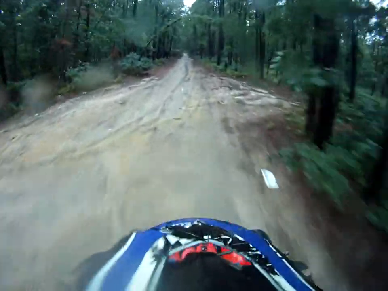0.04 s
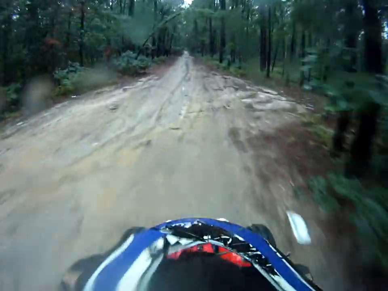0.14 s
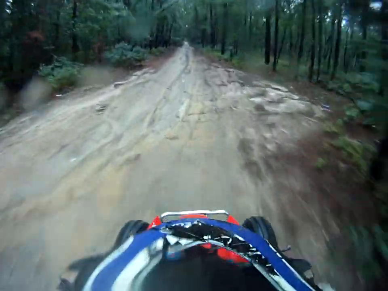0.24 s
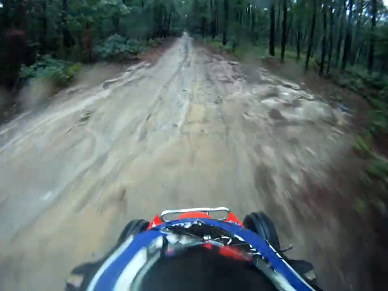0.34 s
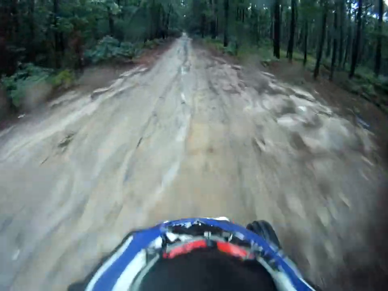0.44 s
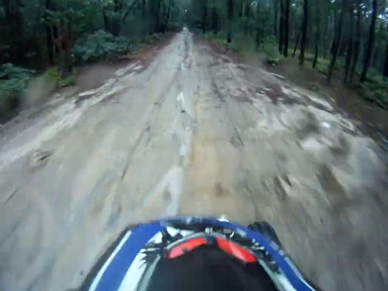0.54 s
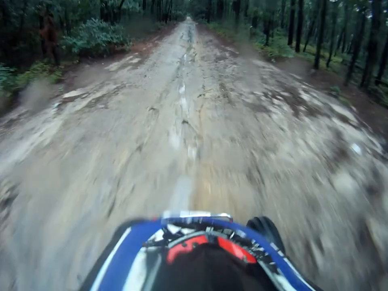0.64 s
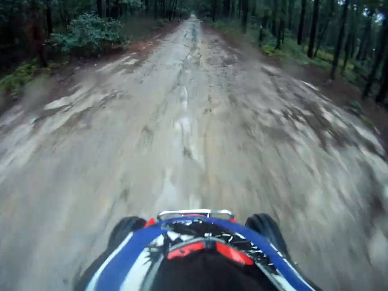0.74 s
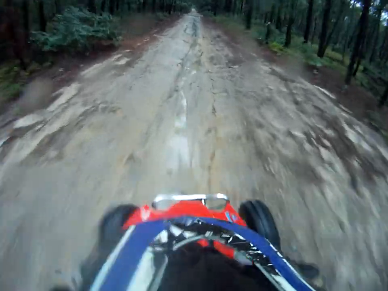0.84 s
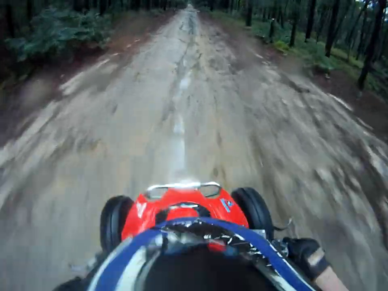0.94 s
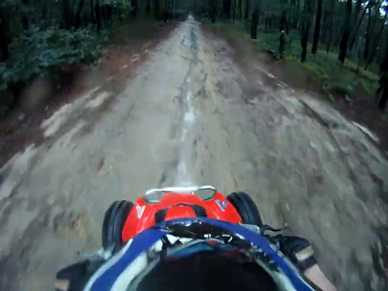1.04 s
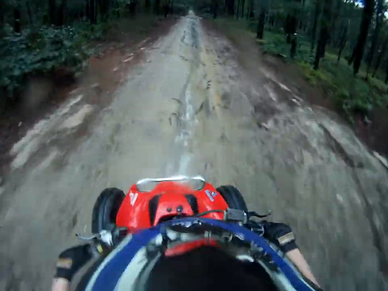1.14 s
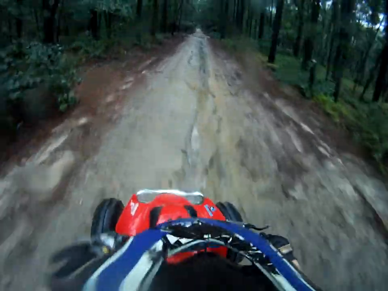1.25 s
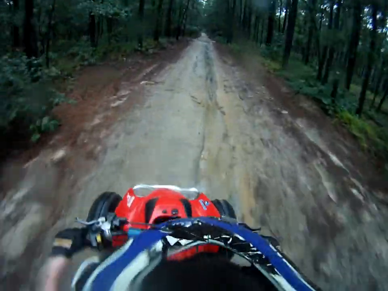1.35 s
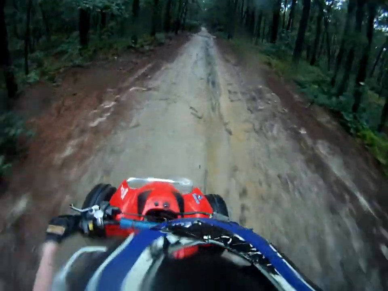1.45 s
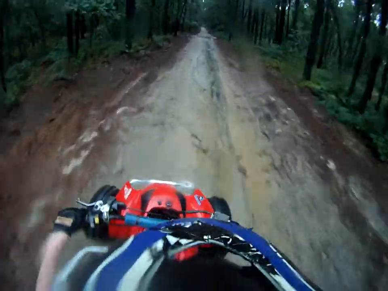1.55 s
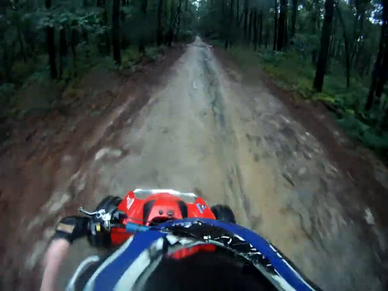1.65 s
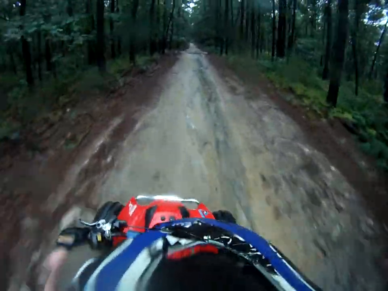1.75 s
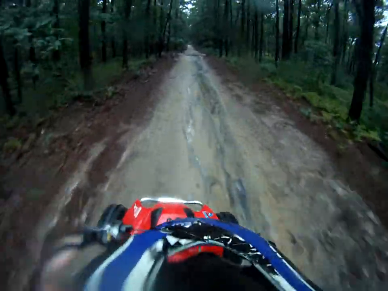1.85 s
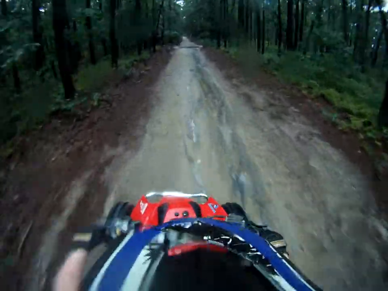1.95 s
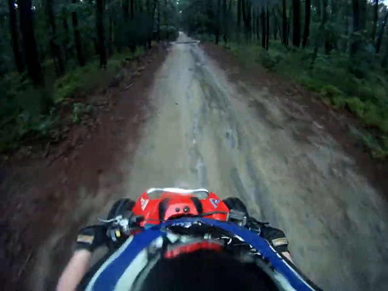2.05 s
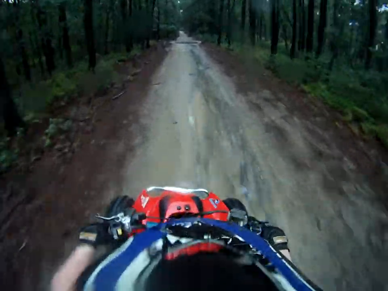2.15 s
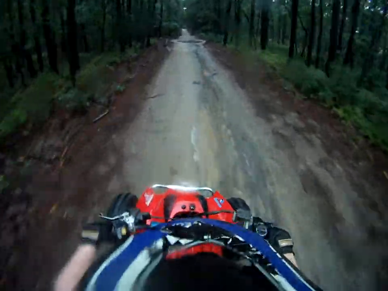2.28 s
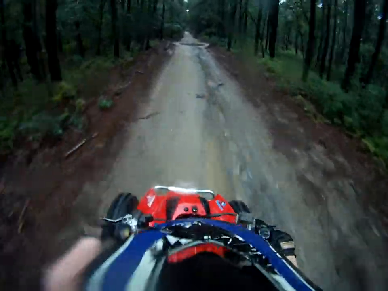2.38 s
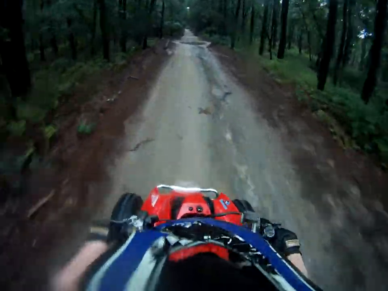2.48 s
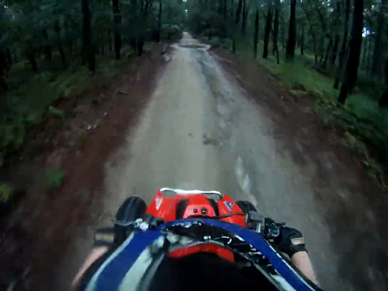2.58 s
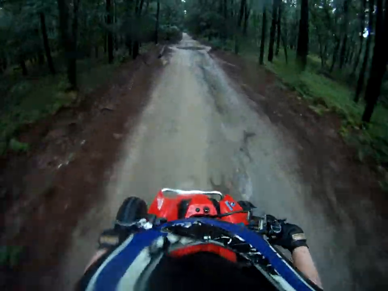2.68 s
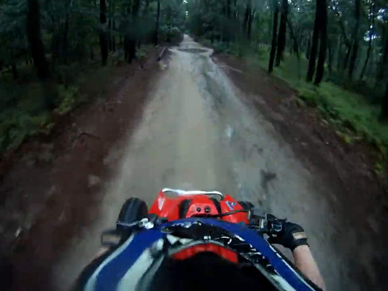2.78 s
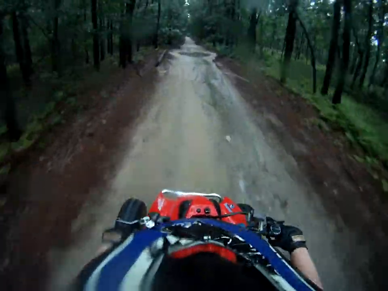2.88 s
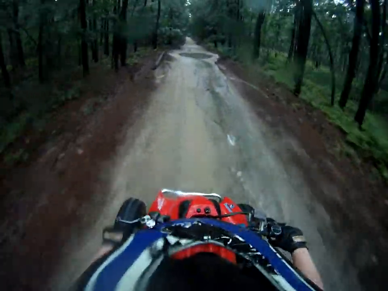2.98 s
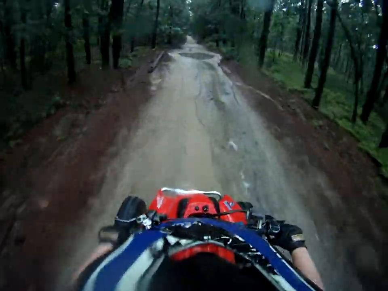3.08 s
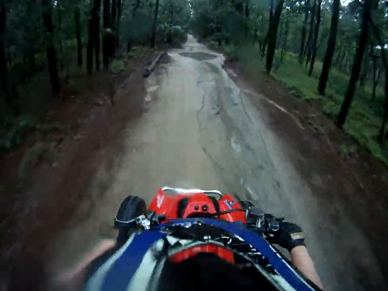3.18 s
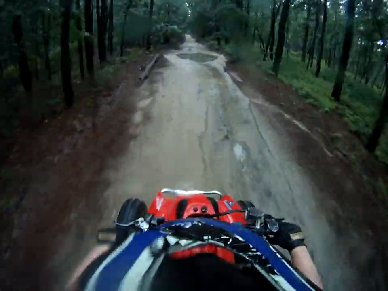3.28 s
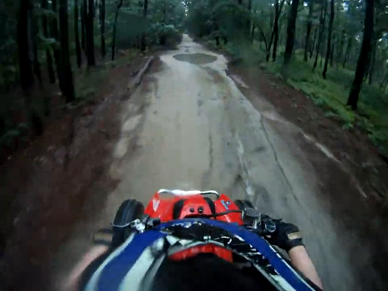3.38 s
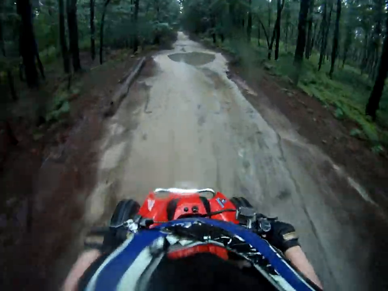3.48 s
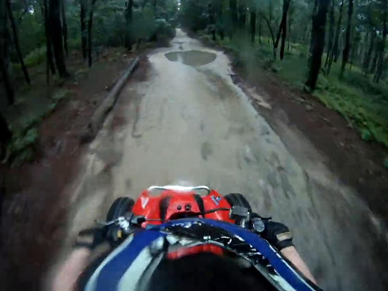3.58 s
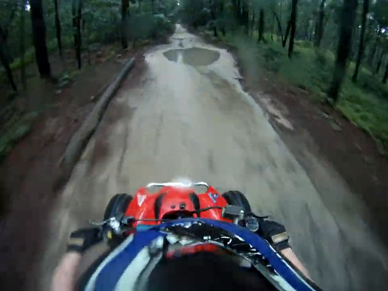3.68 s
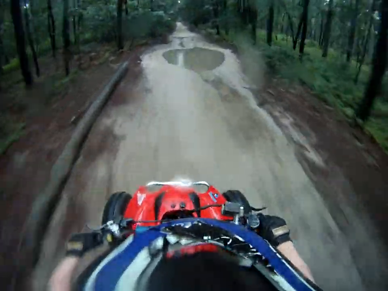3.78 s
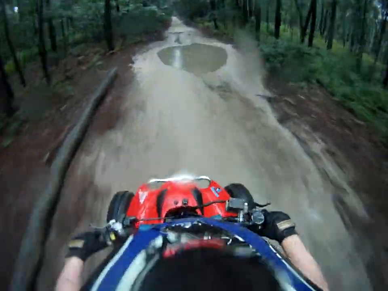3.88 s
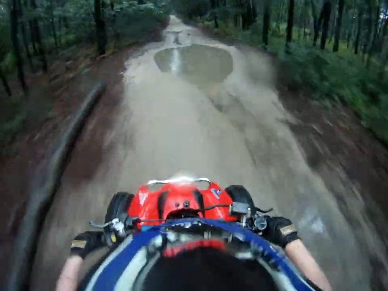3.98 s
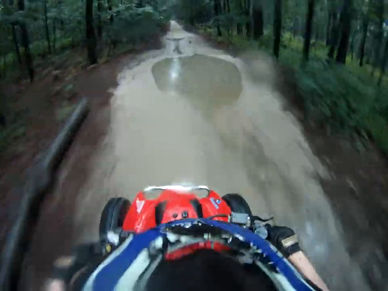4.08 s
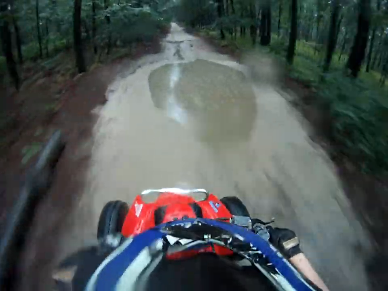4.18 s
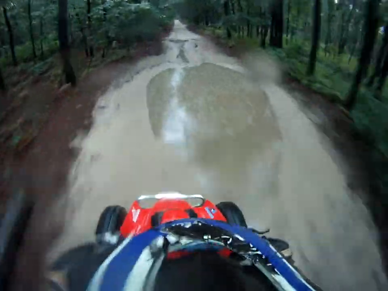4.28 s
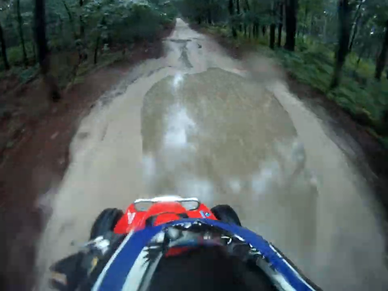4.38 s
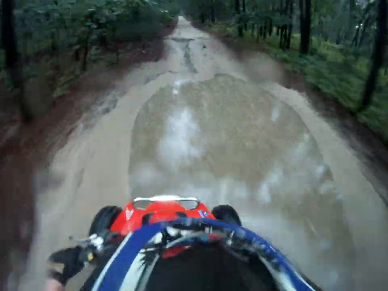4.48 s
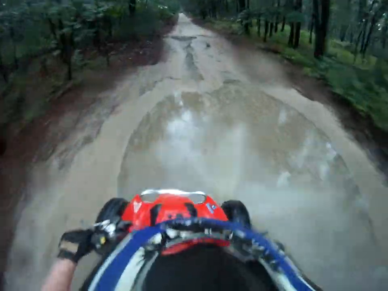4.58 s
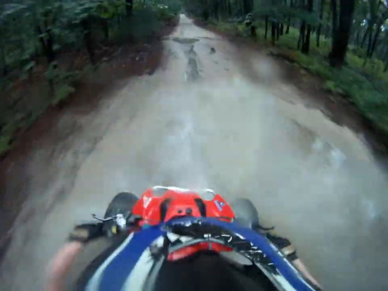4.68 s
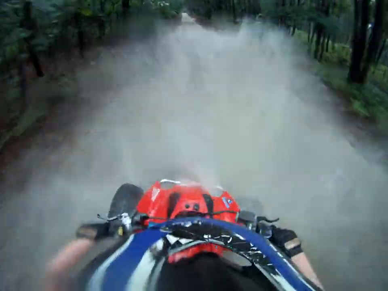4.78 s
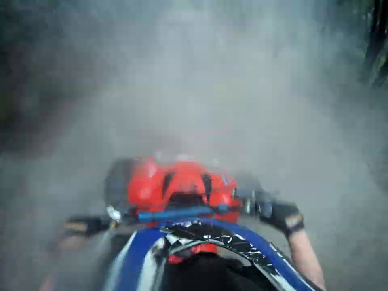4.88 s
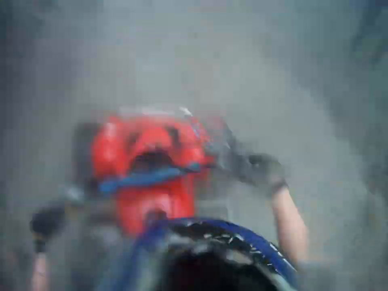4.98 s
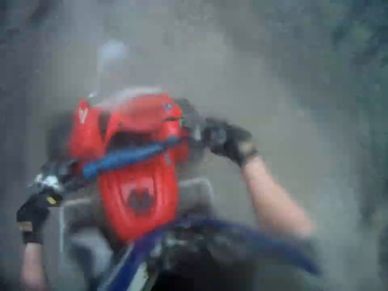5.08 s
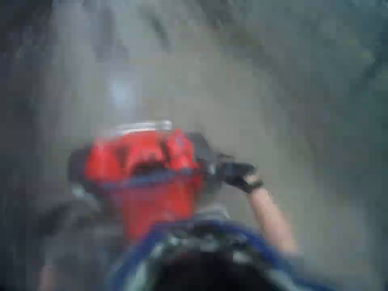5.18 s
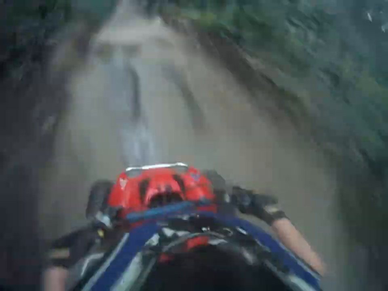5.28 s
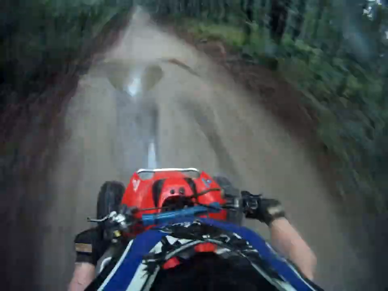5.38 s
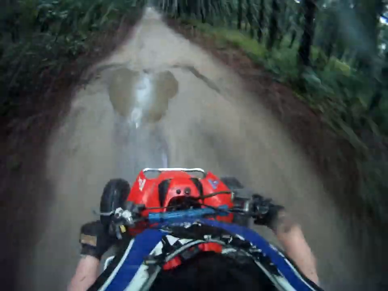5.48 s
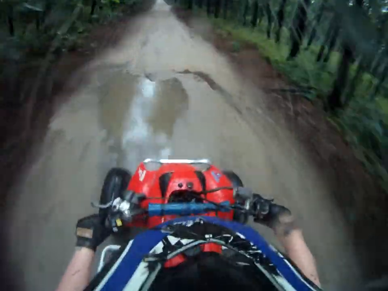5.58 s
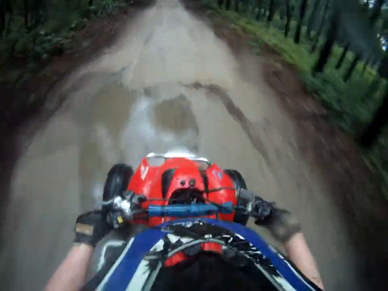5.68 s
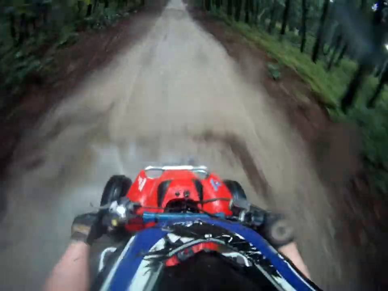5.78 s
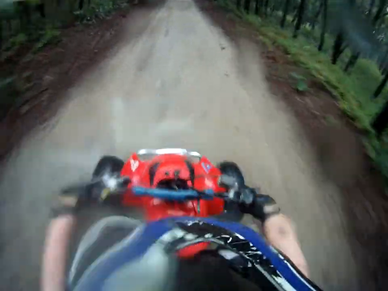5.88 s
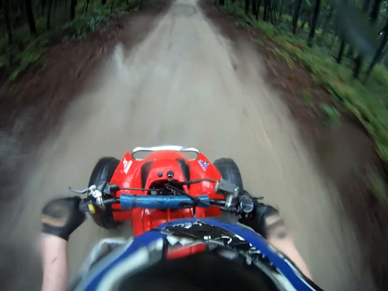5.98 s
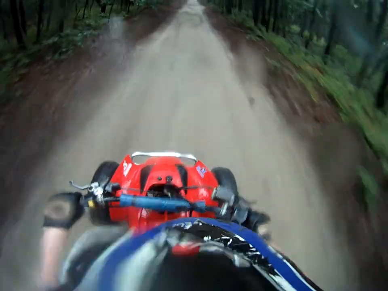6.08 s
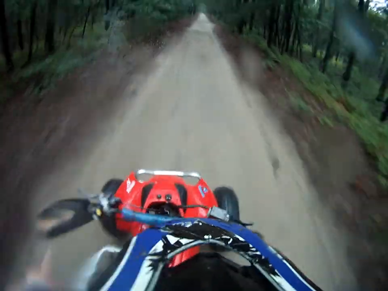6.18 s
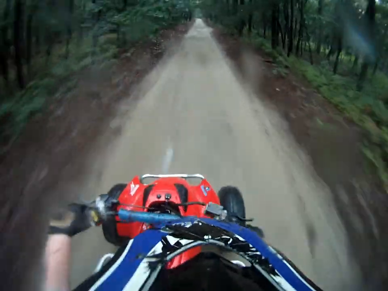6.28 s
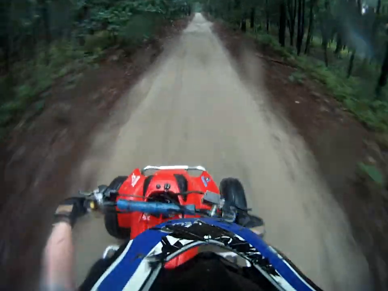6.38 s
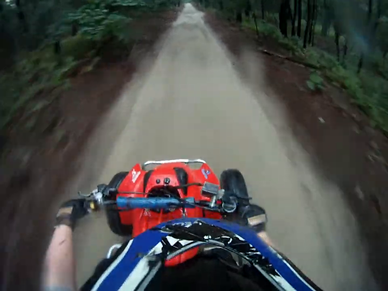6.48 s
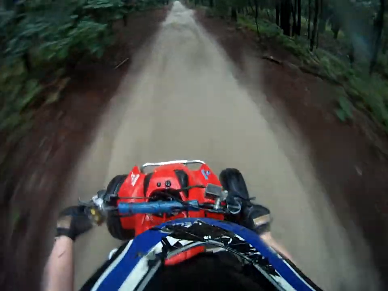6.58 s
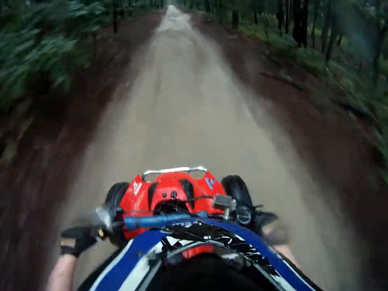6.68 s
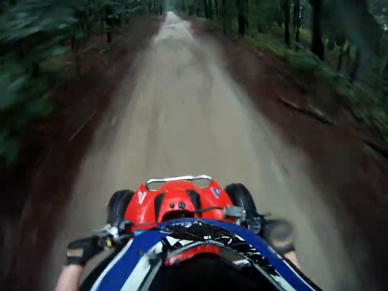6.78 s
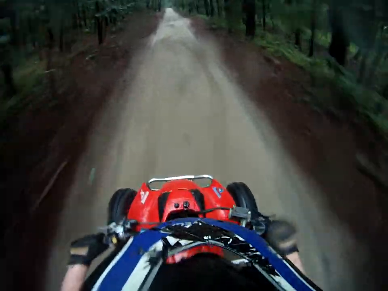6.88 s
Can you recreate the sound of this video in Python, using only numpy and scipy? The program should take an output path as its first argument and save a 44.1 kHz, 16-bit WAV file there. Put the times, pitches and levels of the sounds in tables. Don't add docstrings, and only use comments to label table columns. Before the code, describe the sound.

Helmet-mounted, muffled and distorted sound of a small quad on a wet dirt track: throaty single-cylinder putter, exhaust rasp and case buzz. Scattered ticks and knocks mark the bumps. Midway the engine surges, then a dense splash rattles the housing with watery clatter, sharp clacks and low suspension thuds, the level ducking after overloads. A lighter splash follows, the engine drones on, and one violent knock lands near the end.

```python
import sys
import numpy as np
from scipy import signal
from scipy.io import wavfile
from scipy.ndimage import uniform_filter1d

SR = 44100
rng = np.random.default_rng(int(sys.argv[2]) if len(sys.argv) > 2 else 0)


def inscribe(sig):
    pcm = np.round(np.clip(np.atleast_2d(sig).T, -1, 1) * 32767)
    wavfile.write(sys.argv[1], SR, pcm.astype(np.int16))


def field_ratio(decibels):
    return 10 ** (np.asarray(decibels, dtype=float) / 20)


N = 306054

# hz, width_hz, level_db
CASE_BRIGHT_MODES = [(2850, 680, -3.5), (3586, 324, 1.5), (5200, 10800, -7)]


def rms_one(x):
    return x / np.sqrt(np.mean(x ** 2) + 1e-20)


def in_time(rows):
    s, *columns = np.transpose(rows)
    return [np.interp(np.arange(N) / SR, s, c) for c in columns]


def butter(x, hz, kind, order=2):
    return signal.sosfilt(signal.butter(order, hz, kind, fs=SR, output="sos"), x)


def delayed(x, s):
    return np.r_[np.zeros(int(s * SR)), x][:N]


def ring(x, hz, t60):
    r, w = field_ratio(-60 / (t60 * SR)), 2 * np.pi * hz / SR
    return signal.lfilter([0, np.sin(w)], [1, -2 * r * np.cos(w), r * r], x + 1e-18)


def ring_all(x, modes, tune=1):
    return sum(field_ratio(db) * ring(x, tune * hz, t60) for hz, db, t60 in modes)


def resonate(x, modes):
    out = 0
    for k, (hz, width_hz, db) in enumerate(modes):
        r = np.exp(-np.pi * width_hz / SR)
        b = np.array([1, 0, -1]) * (1 - r * r) / 2
        a = [1, -2 * r * np.cos(2 * np.pi * hz / SR), r * r]
        out = out + (-1) ** k * field_ratio(db) * signal.lfilter(b, a, x)
    return out


def blend(locked, free, free_share):
    return np.sqrt(1 - free_share) * rms_one(locked) + np.sqrt(free_share) * rms_one(free)


def grit(per_s, spread_db):
    sizes = field_ratio(spread_db * np.minimum(rng.exponential(1, N), 2.5)) * rng.choice([-1, 1], N)
    hits = sizes * (rng.random(N) < per_s / SR)
    return rms_one(rms_one(hits) + 1.75 * rng.standard_normal(N))


def spray_db():
    # peak_s, level_db
    splashes = [(4.9, -31), (4.96, -17), (5.03, -18.5), (5.13, -17), (5.19, -17), (5.25, -15.5),
                (5.32, -13), (5.38, -21), (5.45, -22.5), (5.561, -14.5), (5.95, -32)]
    rise_db_s, fall_db_s = 143, 160
    t = np.arange(N) / SR
    power = 0
    for s, db in splashes:
        below_db = np.maximum(rise_db_s * (s - t), fall_db_s * (t - s))
        power = power + field_ratio(db - below_db) ** 2
    return 10 * np.log10(power + 1e-12)


def drops(per_s, cycles):
    clump = rms_one(butter(rng.standard_normal(N), 29, "low"))
    sizes = field_ratio(1.0 * np.minimum(rng.exponential(1, N), 4)) * rng.choice([-1, 1], N)
    born = rng.random(N) < per_s * field_ratio(4.5 * clump) / SR
    pitches, dealt = np.geomspace(850, 3900, 16), rng.integers(0, 16, N)
    lift = field_ratio(12.4 * np.exp(-(np.log(pitches / 2350) / 0.12) ** 2))
    out = 0
    for k, (hz, gain) in enumerate(zip(pitches, lift)):
        out = out + gain * ring(sizes * born * (dealt == k), hz, cycles / hz)
    return rms_one(out)


def knocks():
    # start_s, peak_db, ring_hz, bright_db (re peak), length_ms
    bumps = [(0.216, -15.5, 2080, -22, 3.8), (0.225, -23, 994, -27, 6), (.236, -25, 1430, -20, 6.5),
             (.231, -18, 2100, -26, 4.9), (0.438, -22, 1980, -28, 6.7), (1.956, -22.5, 2240, -3, 4.3),
             (2.155, -19, 2310, -20, 8.1), (2.231, -26, 2070, 0.5, 3.5), (2.65, -24, 2310, -20, 4),
             (2.954, -14.5, 1110, -29.5, 1.8), (3.019, -15.5, 2180, -32, 2.9), (3.388, -15, 2770, -5, 2.6),
             (3.615, -12, 900, -13, 5.4), (3.736, -13.5, 2070, -19, 2.1), (4.123, -21, 2290, -12, 4.7),
             (4.196, -22, 980, -7.5, 5.5), (6.42, -18.5, 2215, -16, 8.4), (6.449, -17, 2220, -6, 4.4),
             (6.475, -15, 2180, -21, 4.2), (6.488, 11, 1850, -8, 2.2), (6.491, -3.5, 996, -37, 5.5),
             (6.682, -5.5, 2340, -11, 2.6)]
    # start_s, peak_db, ring_hz, bright_db (re peak), length_ms
    lumps = [(4.934, -6, 2550, -19, 1.2), (4.986, 3, 2260, -26, 0.69), (5.127, -12, 2250, -23, 3),
             (5.189, -7, 2220, -17, 1.6), (5.265, 4.5, 2287, -33, 2.7), (5.275, -8, 2210, -7, 2.4),
             (5.294, -11, 2480, -6, 4.9), (5.357, -13, 990, -18, 2.2), (5.368, 1.5, 2390, -24, 1.1),
             (5.374, 3, 2140, -19, 1), (5.391, -3.5, 2340, 3.5, 1.2), (5.442, -11, 1950, -5, 4.6),
             (5.483, -8, 990, -29, 4.4), (5.503, -4.5, 2040, -30, 3.4), (5.548, -7, 1090, -28, 1.8),
             (5.585, 3, 1027, -36, 3.05), (5.622, 5.5, 980, -35, 1.9), (5.639, 0.5, 1000, -7, 1.7),
             (5.658, 9.5, 2187, -34, 6.4)]
    # start_s, peak_db, pitch_hz
    jolts = [
        (.215, -21, 100),
        (5.04, -28, 40),
        (5.376, -10, 125),
        (5.547, -5.5, 126),
        (5.6, -15, 90),
        (5.65, -9, 112),
        (6.489, -8, 130),
    ]
    hits = [*bumps, *lumps]
    out, t = np.zeros(N + 2000), np.arange(1500) / SR
    for (s, db, hz, bright_db, ms), noise in zip(hits, rng.standard_normal((len(hits), len(t)))):
        shape = np.minimum(t / 0.0012, 1) * np.exp(-np.maximum(t - ms / 1000, 0) / 0.00091)
        wobble = np.cumsum(butter(noise, 500, "low")) * 0.039
        chatter = 1 + .5 * rms_one(butter(noise[::-1], 1380, "low"))
        tone = np.sin(2 * np.pi * hz * t + wobble) * chatter
        crack = field_ratio(bright_db) * rms_one(resonate(noise, CASE_BRIGHT_MODES))
        rough = 0.3 * rms_one(butter(noise, [850, 2700], "band"))
        out[int(s * SR):int(s * SR) + len(t)] += field_ratio(db) * shape * (tone + crack + rough)
    for s, db, hz in jolts:
        push = np.sin(2 * np.pi * hz * t) * np.minimum(t * hz, 1) * np.exp(-t * hz / 1.8)
        out[int(s * SR):int(s * SR) + len(t)] += field_ratio(db) * push
    return out[:N]


def firings(phase, jitter_s, spread_db):
    # time_s, strength_db
    catches = [
        (.46, 3),
        (.488, -11),
        (.517, 7.5),
        (.575, -7),
        (.686, 2.5),
    ]
    at = np.flatnonzero(np.diff(np.floor(phase)))
    luck = rng.standard_normal((len(at), 2))
    strength_db = spread_db * luck[:, 1]
    for s, db in catches:
        strength_db[np.argmin(np.abs(at - s * SR))] = db
    clicks = np.zeros(N)
    late = (jitter_s * SR * luck[:, 0]).astype(int)
    clicks[np.clip(at + late, 0, N - 1)] = -field_ratio(strength_db)
    return clicks


def turbulence(clicks):
    puff_t60_s = .024
    blows = np.abs(clicks + 0.35 * delayed(clicks, 0.0041))
    puff = signal.lfilter([1], [1, -field_ratio(-60 / (puff_t60_s * SR))], blows)
    return puff * rng.standard_normal(N)


def frame_throb(phase, speed, stones, shut, loose, drowned):
    # order, level_db, lead_rad
    firing_orders = [(2, 11, 0.04), (4, 4, 1.66)]
    waver_db, waver_hz = 2, 14
    turn = 2 * np.pi * phase
    orders = sum(field_ratio(db) * np.sin(order * turn + lead) for order, db, lead in firing_orders)
    orders += field_ratio(-27.0 + 43 * shut) * np.sin(3 * turn + 5.5)
    orders += shut * field_ratio(1.0) * np.sin(6 * turn)
    orders += field_ratio(-24.0 + 1.2 * (speed - 53)) * np.sin(turn)
    rumble = butter(rng.standard_normal(N), [60, 170], "band")
    throb = blend(orders, rumble, .24 * loose * (1 - shut / 2) * (1 - .7 * drowned))
    return throb * field_ratio(waver_db * rms_one(butter(stones, waver_hz, "low")))


def case_buzz(clicks, gated, stones, case_loose):
    # hz, width_hz, level_db
    buzz_modes = [(1850, 310, -16), (2102, 240, 3), (2417, 374, -4.5)]
    slap = rms_one(gated) + 0.39 * rms_one(clicks)
    buzz = blend(resonate(slap, buzz_modes), resonate(stones, buzz_modes), case_loose)
    bright = blend(resonate(gated, CASE_BRIGHT_MODES), resonate(stones, CASE_BRIGHT_MODES), case_loose ** 0.2)
    return buzz, bright


def silencer_crack(clicks, gated, stones, pull, loose):
    # hz, level_db, t60_s
    silencer_modes = [(870, -52, 0.0079), (1061, 25.5, 0.01), (1371, 13, 0.019), (1522, -5, 0.13)]
    pull_bite, pull_thin = 0.58, 0.76
    snap = clicks - 0.49 * delayed(clicks, 0.005043)
    front = rms_one(ring_all(snap, silencer_modes[1:]))
    front = front + .25 * rms_one(ring_all(gated, silencer_modes))
    crack = blend(front, ring_all(stones, silencer_modes), loose ** 1.4)
    bite = pull_bite * resonate(crack, [(1470, 150, 0)])
    thinning = pull_thin * resonate(crack, [(950, 260, 0)])
    crack += np.clip(pull, 0, 1) * (bite - thinning)
    return butter(crack, 740, "high")


def pipe_bark(clicks, stones, pull, shut, loose, drowned):
    # hz, level_db, t60_s
    pipe_modes = [(204, -33, 0.0067), (312, 11.5, 0.049), (399, 10, 0.014), (533.4, 6.5, 0.062),
                  (563, -10.5, 0.14)]
    pull_full, shut_thin = 0.5, 0.83
    round_trip = clicks - 0.21 * delayed(clicks, 0.004803)
    bark = ring_all(round_trip * (1 - drowned), pipe_modes, 0.94)
    bark = bark + ring_all(round_trip * drowned, pipe_modes, 0.855)
    bark = blend(bark, ring_all(stones, pipe_modes, 0.98), .3 * loose ** 2)
    bark += pull_full * np.clip(pull, 0, 1) * (1 - drowned) * resonate(bark, [(352, 73, 0)])
    bark -= shut_thin * shut * resonate(bark, [(430, 270, 0)])
    bark -= 0.75 * resonate(bark, [(125, 127, 0)])
    return bark


def quad(wet):
    # time_s, firings_per_s
    crank_speed = [(0.0, 36.87), (0.46, 33.0), (0.82, 40.0), (0.84, 36.27), (0.94, 39.86), (1.05, 39.05),
                   (1.18, 42.03), (1.22, 40.03), (2.17, 41.72), (4.41, 42.99), (4.57, 45.75), (4.77, 52.08),
                   (4.98, 53.15), (5.03, 49.7), (5.34, 43.84), (5.7, 45.39), (5.87, 47.8), (6.94, 49.15)]
    # time_s, bark_db, pull (against the load: 1 full, below 0 slack and duller)
    throttle = [(0, -23, .2), (.085, -25.5, .1), (.11, -30, .2), (.48, -30.5, .1), (.55, -25, -.1),
                (.68, -24, .6), (.85, -22, .8), (1.42, -19, -.1), (1.75, -23, .05), (4.37, -23, .05),
                (4.6, -17.5, 0.86), (4.8, -20, 0.55), (5.05, -21, -.3), (5.5, -21, .2), (5.68, -13, -.9),
                (5.85, -20, .3), (6.5, -20, .2), (6.94, -23.5, .1)]
    start_phase, cruise_db, cruise_per_s = .97, -23, 42
    drown_s, drown_in_s, drown_hold_s, drain_s = 4.52, 0.057, 0.34, 0.25
    speed = in_time(crank_speed)[0]
    phase = start_phase + np.cumsum(speed) / SR
    bark_db, pull = in_time(throttle)
    load_db = bark_db - cruise_db
    shut = np.clip(-load_db / 10, 0, 1)
    faster = speed - cruise_per_s
    revs = np.maximum(faster, 0)
    drown_times = np.cumsum([drown_s, drown_in_s, drown_hold_s, drain_s])
    drowned = np.interp(np.arange(N) / SR, drown_times, [0, 1, 1, 0])

    crack_db = -29.5 + load_db + 9 * pull + 0.1555 * faster + 1.5 * drowned
    throb_db = -28.5 + 0.67 * np.maximum(load_db, -3) + 0.1646 * revs + 3 * wet
    shake_db = 0.46 * load_db + 6 * pull + 0.585 * revs + 6.5 * wet
    buzz_db = -35 + shake_db + 4.5 * drowned
    bright_db = -40.5 + 0.75 * shake_db + 4.5 * wet

    loose = np.clip(.3 + 0.91 * shut - 0.071 * pull + 0.99 * wet ** 2, 0, 1)
    case_loose = np.clip(0.62 - 0.52 * pull + 0.3 * wet ** 2, 0, 1)
    case_loose *= np.clip(1 - 0.61 * drowned * (1 - wet ** 2), 0, 1)

    clicks = firings(phase, jitter_s=.00006, spread_db=0.5)
    stones = grit(per_s=900, spread_db=-1.5)
    gated = turbulence(clicks)
    throb = frame_throb(phase, speed, stones, shut, loose, drowned)
    buzz, bright = case_buzz(clicks, gated, stones, case_loose)
    crack = silencer_crack(clicks, gated, stones, pull, loose)
    bark = pipe_bark(clicks, stones, pull, shut, loose, drowned)
    exhaust = field_ratio(bark_db) * bark + field_ratio(crack_db) * crack
    return exhaust + field_ratio(throb_db) * throb + field_ratio(buzz_db) * buzz + field_ratio(bright_db) * bright


def scene():
    dry_db, soaked_db = -39.5, -16
    notch_hz, notch_width_hz = 657, 84
    water_db = spray_db()
    wet = np.clip((water_db - dry_db) / (soaked_db - dry_db), 0, 1)
    sound = field_ratio(water_db) * drops(per_s=1100, cycles=27) + knocks() + quad(wet)
    sound -= 0.47 * resonate(sound, [(1.123 * notch_hz, notch_width_hz, 0)])
    sound -= 0.9 * resonate(sound, [(notch_hz, notch_width_hz, 0)])
    return sound[None]


def band_limit(x):
    return signal.sosfilt(signal.butter(12, 15740, fs=SR, output="sos"), x)


def record(dry):
    # start_s, depth_db
    ducks = [
        (5.27, 7.5),
        (5.504, 3.5),
        (5.593, 8.5),
        (5.664, 16.5),
        (6.495, 13.5),
    ]
    hold_hz = 12000
    t, duck_db = np.arange(N) / SR, np.zeros(N)
    for s, depth_db in ducks:
        recovered_db = 120 * np.maximum(t - s - .065, 0)
        duck_db = np.maximum(duck_db, (t > s) * np.clip(depth_db - recovered_db, 0, None))
    x = butter(dry[0] * field_ratio(-uniform_filter1d(duck_db, size=60)), 34, "high")
    x = signal.sosfilt(signal.cheby2(10, 9, 5760, fs=SR, output="sos"), x)
    samples = signal.resample_poly(x, hold_hz // 300, SR // 300, window=("kaiser", 8))
    samples = np.clip(samples, -.99, .99)
    held = signal.resample_poly(np.repeat(samples, 4), SR // 300, 4 * hold_hz // 300)[:N]
    held = signal.sosfilt(signal.cheby2(12, 22, 15350, fs=SR, output="sos"), held)
    mix = np.clip(np.pad(held, (0, N - len(held))), -1, 1)[None]
    return band_limit(mix)


dry = scene()
out = record(dry)
inscribe(out)
```